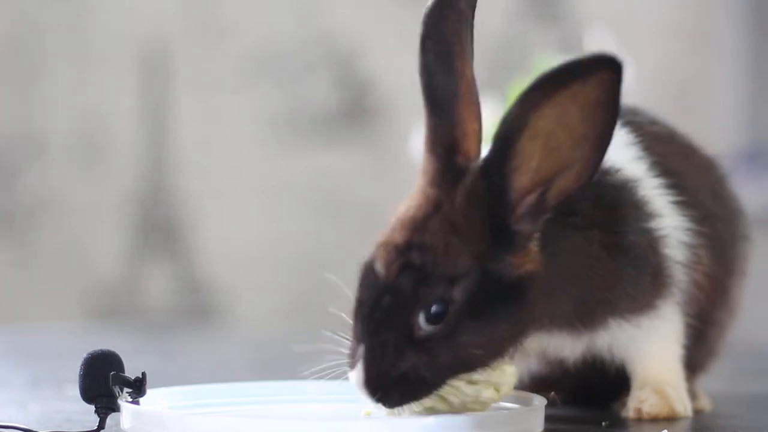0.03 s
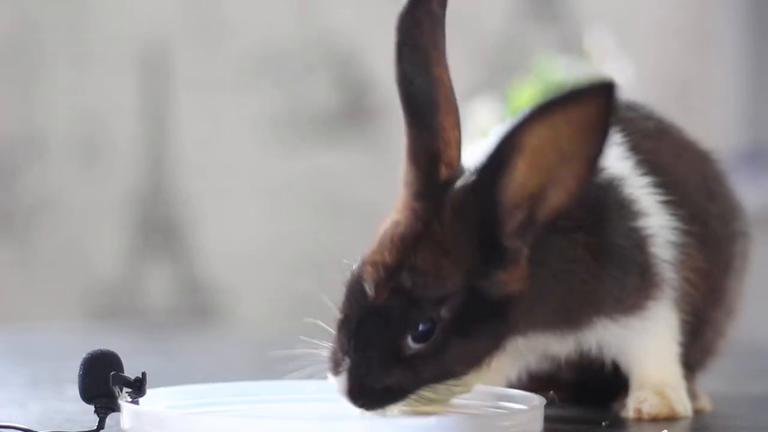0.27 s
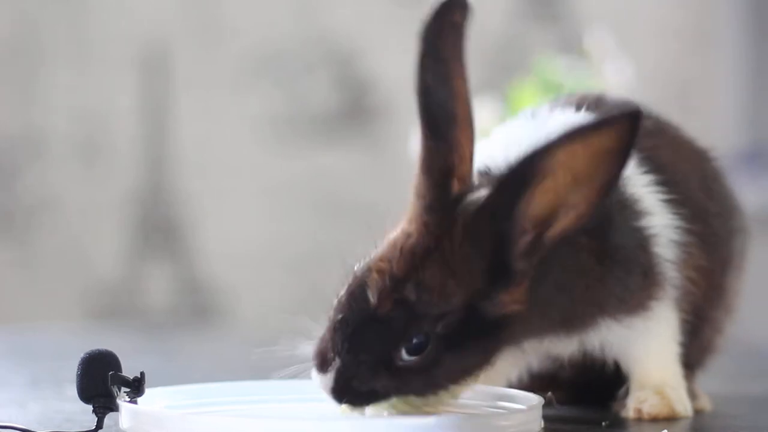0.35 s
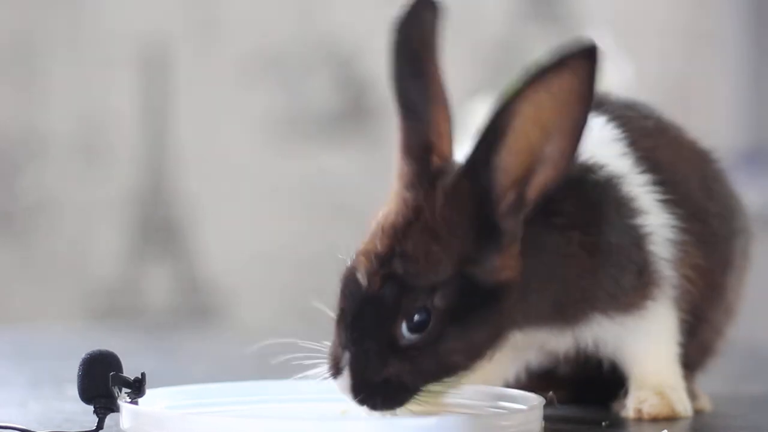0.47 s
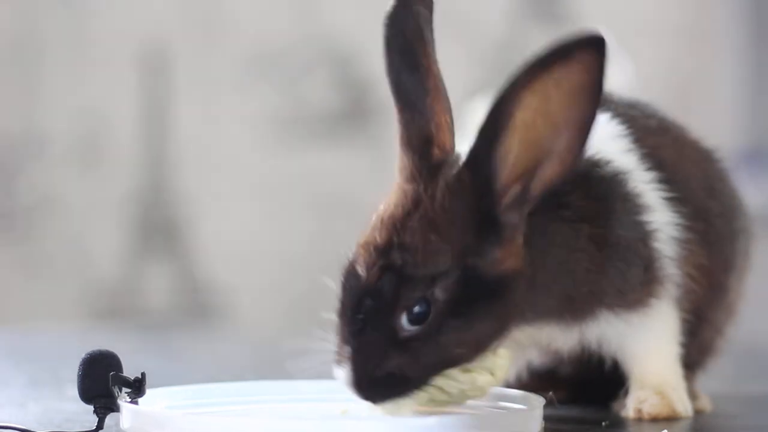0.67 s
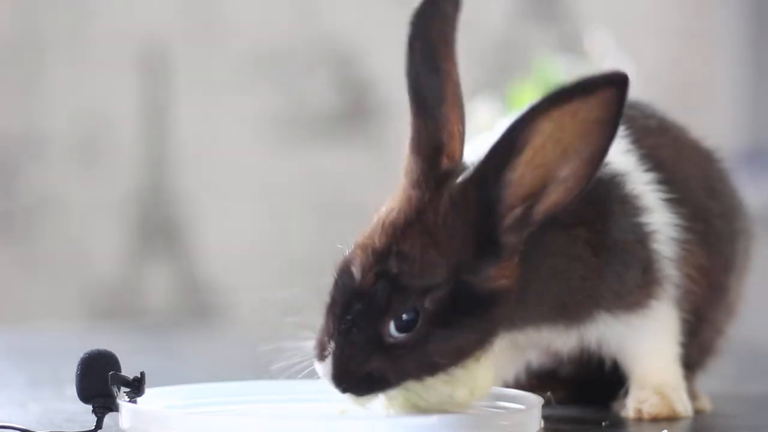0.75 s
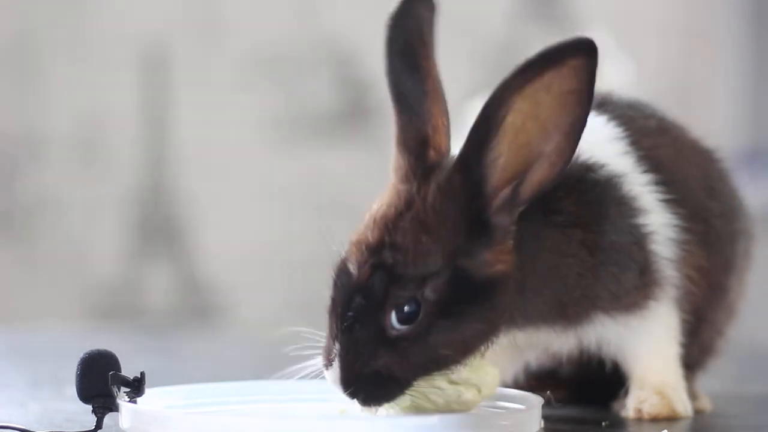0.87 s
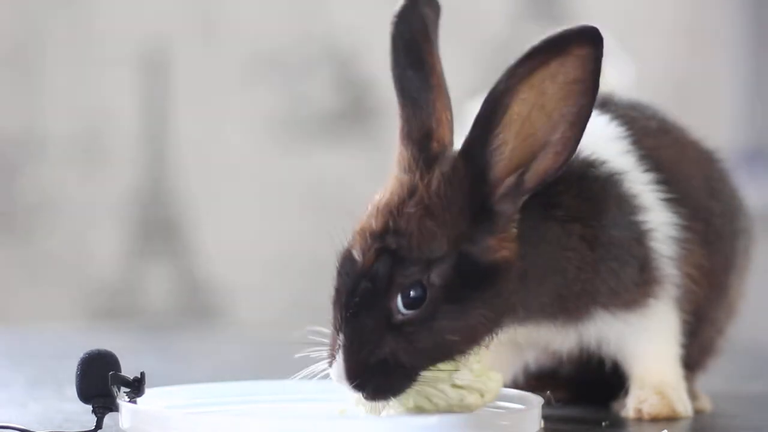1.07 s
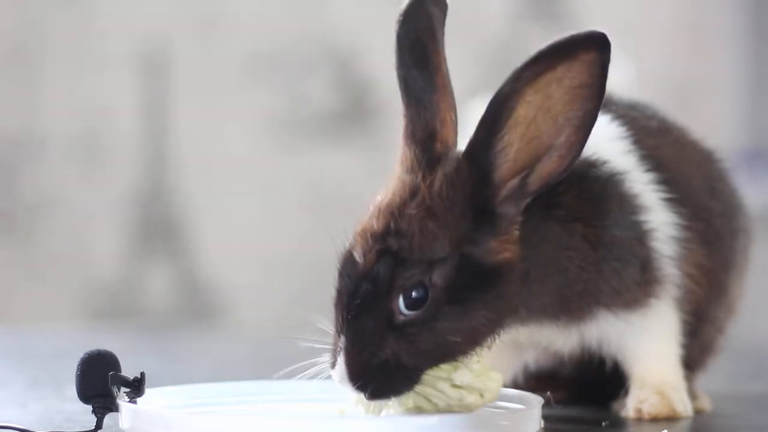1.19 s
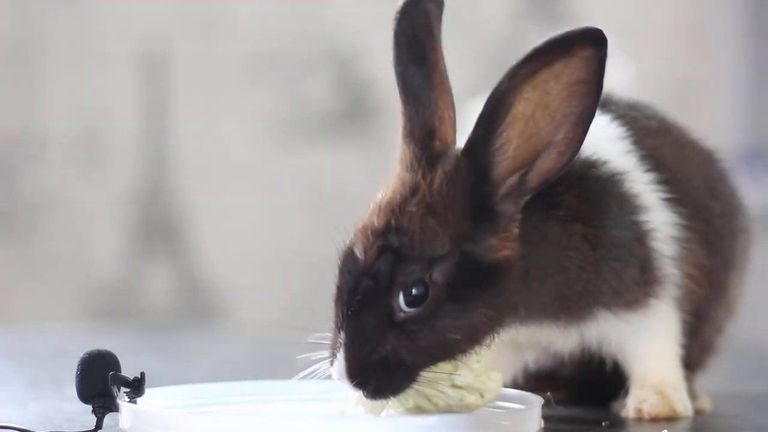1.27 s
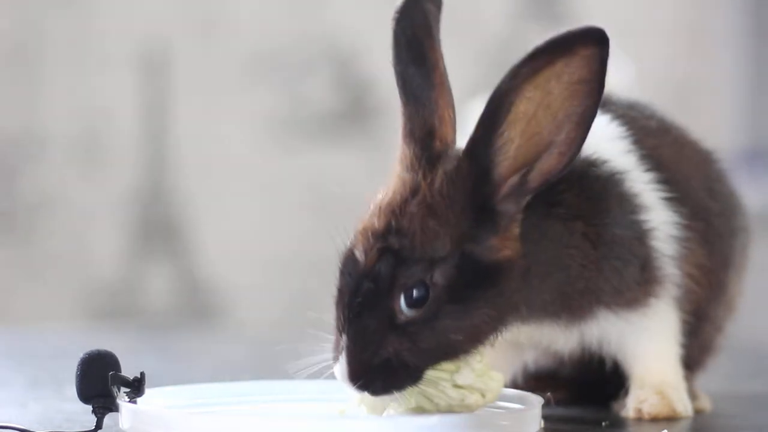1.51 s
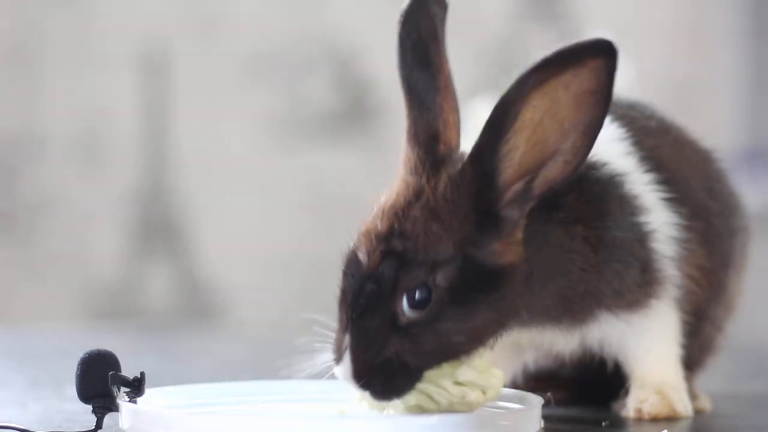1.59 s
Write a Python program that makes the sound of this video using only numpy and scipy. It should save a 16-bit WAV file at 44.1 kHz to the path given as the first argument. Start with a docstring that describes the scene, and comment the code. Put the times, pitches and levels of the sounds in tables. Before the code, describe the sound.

A rabbit eats a raw leafy vegetable close to the microphone in a small room. Soft tearing and light bumps lead to a hard crunch and plastic dish knock at 0.24 s. Rasps and bright snaps cluster from 0.32 to 0.63, sharpest near 0.43 and 0.52. Another tear and dull knocks come at 0.75-0.85, then faint nibbles near 1.2 and 1.42, over hiss, low hum and a barely audible thin whistle around 1.3-1.5.

```python
"""In a small room, a rabbit bites a raw leafy vegetable in a thin plastic dish beside a microphone.
Leaves tear in short rasps made of many fibre impulses; crisp ribs snap as brief damped clicks.
Each tug knocks the vegetable on the dish, a force pulse exciting decaying modes, with a leafy rattle.
Then it chews almost silently, with a few faint tears and snaps, over filtered-noise hiss, a low
wavering hum and a faint thin whistle. A weak diffuse tail follows the eating sounds."""
import sys
import numpy as np
from scipy import signal
from scipy.fft import rfft, irfft
from scipy.io import wavfile

SR = 44100
rng = np.random.default_rng(int(sys.argv[2]) if len(sys.argv) > 2 else 0)


def put_to_file(sound):
    """Save the sound as 16-bit audio at rate SR, in the file named by the first command-line argument."""
    columns = np.atleast_2d(sound).T  # one column per channel
    safe = np.clip(columns, -1, 1)
    whole_steps = np.round(safe * 32767)
    wavfile.write(sys.argv[1], SR, whole_steps.astype(np.int16))


N = 72765  # length in samples


def amp(db):
    """Level law: converts decibels to an amplitude ratio."""
    return 10 ** (np.asarray(db) / 20)


def evened(x):
    """Normalization: scales a signal to unit rms."""
    return x / np.sqrt(np.mean(x ** 2) + 1e-20)


def read(points, hz):
    """Logarithmic frequency scale: interpolates a table along log f."""
    f, value = np.transpose(points)
    return np.interp(np.log(hz + 1), np.log(f), value)


def add(mix, s, sound):
    """Superposition: adds a sound into the mix from time s."""
    part = mix[max(round(s * SR), 0):][:len(sound)]
    part += sound[:len(part)]


def coloured(x, db_at):
    """Minimum-phase filtering: the phase is the Hilbert transform of the log gain."""
    hz = abs(np.fft.fftfreq(4096, 1 / SR))
    log_gain = np.log(amp(db_at(hz)))
    taps = np.fft.ifft(np.exp(np.conj(signal.hilbert(log_gain)))).real
    causal_taps = taps[:len(taps) // 2]
    return signal.fftconvolve(x, causal_taps)[:len(x)]


def shaped_noise(points):
    """Spectral shaping: white noise weighted in frequency, then set to unit rms."""
    gain = amp(read(points, np.fft.rfftfreq(N, 1 / SR)))
    return evened(irfft(rfft(rng.standard_normal(N)) * gain, N))


def narrow_noise(hz, width_hz):
    """Modulation: slow complex Gaussian noise on a carrier makes a wavering tone."""
    white = rng.standard_normal(N) + 1j * rng.standard_normal(N)
    band = np.exp(-(np.fft.fftfreq(N, 1 / SR) / width_hz) ** 2)
    slow = np.fft.ifft(white * band)
    carrier = np.exp(2j * np.pi * np.cumsum(hz * np.ones(N)) / SR)
    return evened((slow * carrier).real)


# spectral density of the room noise, relative: f/Hz, level/dB (per Hz)
ROOM_NOISE = [(12, -87), (20, 1.5), (44, -6), (68, -10), (101, -3), (203, -9), (247, -5.5), (284, -10.5),
              (693, -12), (754, -14.5), (891, -13.5), (5950, -31), (15800, -35)]
# density of the noise that is opposite in the two channels, relative: f/Hz, level/dB (per Hz)
SIDE_NOISE = [(12, -18), (20, -6), (110, -21), (172, -18), (942, -23), (1470, -30), (3600, -22.5),
              (15800, -22)]
HISS_DB, SIDE_HISS_DB = -54.5, -68  # rms levels


def hiss():
    """Stationary noise: a common part, plus a trace in opposite polarity in the two channels."""
    side = amp(SIDE_HISS_DB) * shaped_noise(SIDE_NOISE)
    return amp(HISS_DB) * shaped_noise(ROOM_NOISE) + np.array([side, -side])


HUM_HZ, HUM_WIDTH_HZ, HUM_DB = 97, 12, -61.5


def hum():
    """Narrow-band noise: a small bandwidth gives a low pitch with slow random wavering."""
    return amp(HUM_DB) * narrow_noise(HUM_HZ, HUM_WIDTH_HZ)


# course of the faint thin whistle: t/s, f/Hz, level/dB
WHISTLE_PATH = [(1.24, 6120, -88), (1.31, 6000, -69), (1.39, 5980, -72), (1.461, 5770, -75),
                (1.53, 5930, -85)]
WHISTLE_WIDTH_HZ = 370


def whistle():
    """Frequency modulation: narrow-band noise whose centre and level glide between points."""
    t = np.arange(N) / SR
    s, hz, db = np.transpose(WHISTLE_PATH)
    level = amp(np.interp(t, s, db))
    return level * narrow_noise(np.interp(t, s, hz), WHISTLE_WIDTH_HZ)


BEND_HZ = 1200


def bent(x, order=4):
    """Dispersion of bending waves: all-pass sections delay notes below BEND_HZ after the treble."""
    r = np.exp(-2 * np.pi * BEND_HZ / SR)
    return signal.sosfilt([[-r, 1, 0, 1, -r, 0]] * order, x)


# modes of the loaded dish: f/Hz, level/dB (relative), decay time t60/s
DISH_MODES = [(99.3, -2, 0.081), (153, -4.5, 0.032), (268.4, -5, 0.037), (351.4, -7.5, 0.036),
              (534, -12, 0.041), (610, -24, 0.17), (821, -1, 0.031), (1086, -5, 0.013), (1253, -22, 0.15),
              (1429, -27.5, 0.094), (1595, -15, 0.013), (1830, -12.5, 0.016), (2157, -4.5, 0.017),
              (2800, -17, 0.016), (3130, -8.5, 0.016), (3670, -14, .02), (3960, -11.5, 0.022),
              (5950, -12, 0.028)]
CRACK_DB, CRACK_S = -6, 0.00042  # contact crack, relative to the modes


def dish_ring():
    """Modal superposition: damped sinusoids plus a short contact crack, spread by dispersion."""
    t = np.arange(SR // 4) / SR
    modes = sum(amp(db - 60 * t / t60) * np.sin(2 * np.pi * hz * t) for hz, db, t60 in DISH_MODES)
    crack = np.exp(-t / CRACK_S) * (1 - t / CRACK_S)
    return bent(modes + amp(CRACK_DB) * crack)


# blows of the vegetable on the dish: t/s, level/dB, hardness f/Hz, rattle level/dB (re the blow)
BLOWS = [(.004, -31.5, 278, -14.5), (.025, -34, 318, -13), (0.1621, -25, 327, -21), (0.177, -29, 483, -26),
         (0.2331, -16, 520, -36), (0.2361, -16, 2800, -40), (0.2398, -9, 4400, -8), (0.374, -29, 169, -10),
         (0.3857, -33.5, 2170, -9), (0.394, -30, 387, -19), (0.413, -26, 240, -4.5),
         (0.4182, -48, 2440, -16), (0.4264, -19.5, 426, -28), (0.4344, -27, 1333, 0), (0.543, -56, 400, -5),
         (0.5528, -25.5, 516, -15), (0.562, -35.5, 328, -2), (0.797, -27.5, 460, -11),
         (0.8069, -22, 370, -28), (.812, -18, 337, -18), (0.823, -30, 377, -29.5),
         (.842, -34.5, 256, -18.5), (1.157, -56.5, 2450, 11)]
RATTLE_S, RATTLE_LOW_HZ, RATTLE_HIGH_HZ = 0.0096, 265, 990
DISH_LOW_HZ, SUB_HZ = 69.6, 50  # high-pass corners


def knocks():
    """Impact excitation: a softer blow has a longer force pulse, so it excites less treble.

    Loose leaves rattle briefly from each blow, as decaying band-passed noise."""
    ring = dish_ring()
    t = np.arange(len(ring)) / SR
    band = signal.butter(2, [RATTLE_LOW_HZ, RATTLE_HIGH_HZ], "bandpass", fs=SR, output="sos")
    bursts = rng.standard_normal((len(BLOWS), len(t))) * np.exp(1 - t / RATTLE_S)
    rattles = signal.sosfilt(band, bursts)
    out = np.zeros(N)
    for (s, db, hard_hz, rattle_db), rattle in zip(BLOWS, rattles):
        force = t ** 2 * np.exp(-2 * np.pi * hard_hz * t)
        struck = signal.fftconvolve(force / force.sum(), ring)[:len(t)]
        add(out, s, amp(db) * (struck + amp(rattle_db) * rattle))
    # subtracting the low-passed part leaves a gentle high-pass
    out = out - signal.lfilter(*signal.butter(1, SUB_HZ, fs=SR), out)
    return signal.sosfilt(signal.butter(2, DISH_LOW_HZ, "highpass", fs=SR, output="sos"), out)


# reverberation of the room: f/Hz, decay time t60/s
ROOM_DECAY = [(80, 0.63), (300, 0.12), (1200, 0.47), (3000, 0.73), (8000, 0.36), (16000, 0.11)]
# colour of the reverberation: f/Hz, level/dB
ROOM_TONE = [(40, -9), (150, -1), (560, 0), (820, -14), (1250, -5.5), (2500, -12), (5000, -11),
             (16000, 4.5)]
ROOM_DB, ROOM_RISE_S = -13.5, 0.017


def room(x):
    """Diffuse reverberation: a noise tail builds up, and each band decays at its own rate."""
    hz, t, bands = signal.stft(rng.standard_normal(SR // 2), SR, nperseg=256)
    decay = amp(-60 * t / read(ROOM_DECAY, hz)[:, None])
    tail = signal.istft(bands * decay, SR)[1]
    tail = tail * np.minimum(np.arange(len(tail)) / SR / ROOM_RISE_S, 1)
    wet = signal.fftconvolve(x, tail / np.linalg.norm(tail))[:N]
    return amp(ROOM_DB) * coloured(wet, lambda f: read(ROOM_TONE, f))


# colour of tearing: f/Hz, level/dB
LEAF_COLOUR = [(40, -21), (200, 0), (550, -8), (1100, -11), (1650, -16.5), (2200, -3), (2800, -30),
               (4700, -26), (6500, -22.5), (10500, -21.5), (13000, -27.5), (16000, -49)]
# resonances of the hollow of the dish: f/Hz, width f/Hz, lift level/dB
HOLLOW_RESONANCES = [(744, 450, 6.5), (1260, 280, 12), (2220, 310, -2.5), (3137, 435, 17.5),
                     (3980, 120, 12), (6000, 520, 7)]


def leaf_colour(f):
    """Resonance: peaks or dips in level stand on the broad spectrum of tearing."""
    lift = sum(db / (1 + (2 * (f - hz) / width) ** 2) for hz, width, db in HOLLOW_RESONANCES)
    return read(LEAF_COLOUR, f) + lift


def dull(x):
    """Zero-phase low-pass filtering: keeps what lies below the crisp treble."""
    crisp_hz = 4500
    return signal.filtfilt(*signal.butter(2, crisp_hz, fs=SR), x)


# leaves tearing: start t/s, rise t/s, hold t/s, release t/s, level/dB, treble level/dB (relative)
LEAF_TEARS = [(0.066, 0.018, 0.017, .012, -45.5, 0), (.094, 0.0095, 0.014, 0.021, -38.5, -2),
              (0.135, 0.0051, 0.023, 0.053, -53, 2.5), (0.322, 0.012, 0.0032, 0.012, -36, -2.5),
              (0.34, 0.0084, 0.014, 0.021, -43.5, 1.5), (0.383, 0.00087, 0.026, 0.069, -45, -2),
              (0.461, 0.0096, 0.039, 0.072, -51, -0.5), (0.737, .005, 0.0055, 0.015, -50.5, -13),
              (.7575, 0.0013, 0.0079, 0.0065, -35.5, -2.5), (0.766, 0.0041, 0.0057, 0.026, -33, -1),
              (0.806, .003, .003, 0.013, -48, 2.5), (1.118, 0.028, 0.024, 0.075, -63, -4)]
FIBRES_PER_S, FIBRE_SPREAD_DB = 10000, 2
CRUMBS_PER_S, CRUMB_DB = 110, 14


def tears():
    """Random impulse train: fibres give way in thousands per second, with stray crumbs in the treble."""
    t, out = np.arange(N) / SR, np.zeros(N)
    fibre_size = amp(FIBRE_SPREAD_DB * np.minimum(rng.exponential(1, N), 4))
    fibres = (rng.random(N) < FIBRES_PER_S / SR) * rng.choice([-1, 1], N) * fibre_size
    crumbs = (rng.random(N) < CRUMBS_PER_S / SR) * rng.standard_normal(N) * amp(CRUMB_DB)
    for s, rise, hold, release, db, crisp_db in LEAF_TEARS:
        corners = s + np.cumsum([0, rise, hold, release])
        pull = amp(db) * np.interp(t, corners, [0, 1, 1, 0])
        rasp = rng.permutation(fibres)  # the same fibres in a new order
        crackle = rasp + rng.permutation(crumbs)
        treble = crackle - dull(crackle)
        out += pull * (dull(rasp) + amp(crisp_db) * treble)
    # levels are relative to the coloured fibres alone
    return coloured(out, leaf_colour) / np.std(coloured(fibres, leaf_colour))


# crisp ribs snapping between the teeth: t/s, level/dB, pitch f/Hz, width f/Hz
RIB_SNAPS = [(0.126, -43, 10000, 6000), (.1575, -34.5, 1820, 1930), (.2362, -21, 9800, 5000),
             (.2399, -19, 5200, 5500), (.2407, -23, 8500, 3500), (0.3347, -26.5, 8200, 9000),
             (0.3858, -27, 2040, 2930), (.396, -35, 8050, 6000), (.418, -31.5, 11100, 9000),
             (0.4341, -12, 8400, 5200), (0.4333, -17.5, 2780, 3780), (.4737, -26.5, 8800, 4500),
             (0.4776, -34, 7550, 5000), (.4957, -34, 9500, 6000), (0.5082, -29, 11000, 4930),
             (0.52, -18, 7840, 4270), (0.5233, -25, 7400, 3500), (0.5409, -21.5, 7140, 6000),
             (0.6044, -36.5, 3100, 2420), (.630, -40, 4536, 2950), (1.184, -50, 9700, 3000),
             (1.208, -42, 9200, 6000), (1.4235, -37, 13200, 6000)]
SPLINTER_DB, SPLINTER_S = -23, .0011  # relative to the break, decay time


def snaps():
    """Impulse response: a fracture and its tiny splinters excite a damped click of a few cycles."""
    t, out = np.arange(SR // 50) / SR, np.zeros(N)
    grits = rng.standard_normal((len(RIB_SNAPS), len(t)))
    for (s, db, hz, width_hz), grit in zip(RIB_SNAPS, grits):
        age = np.pi * width_hz * t
        click = age * np.exp(1 - age) * np.sin(2 * np.pi * hz * t)
        splinters = amp(SPLINTER_DB) * grit * np.exp(-t / SPLINTER_S)
        fracture = (t == 0) + splinters
        add(out, s, amp(db) * signal.fftconvolve(fracture, click))
    return out


def scene():
    """Superposition: direct eating sounds, their reverberation and the background add linearly."""
    background = hiss() + hum() + whistle()
    eating = knocks() + tears() + snaps()
    return eating + room(eating) + background


def record(dry):
    """Band limiting: a linear-phase low-pass filter removes the highest treble."""
    edge_hz = 16000
    taps = signal.firwin(255, edge_hz, window=("kaiser", 8), fs=SR)
    return signal.oaconvolve(dry, taps[None], "same")


dry = scene()
out = record(dry)
put_to_file(out)
```